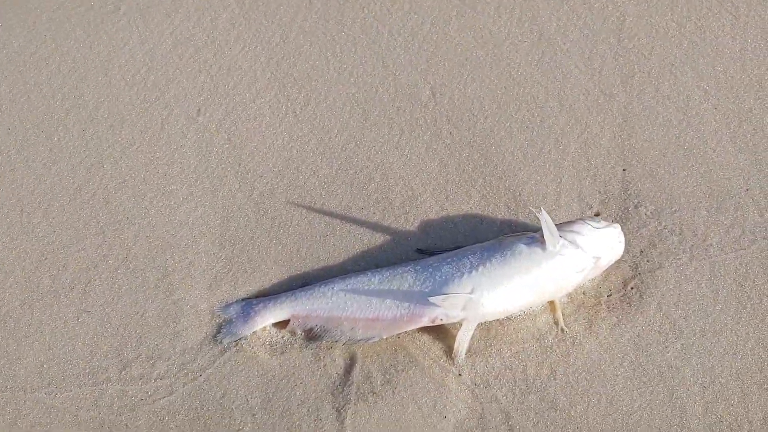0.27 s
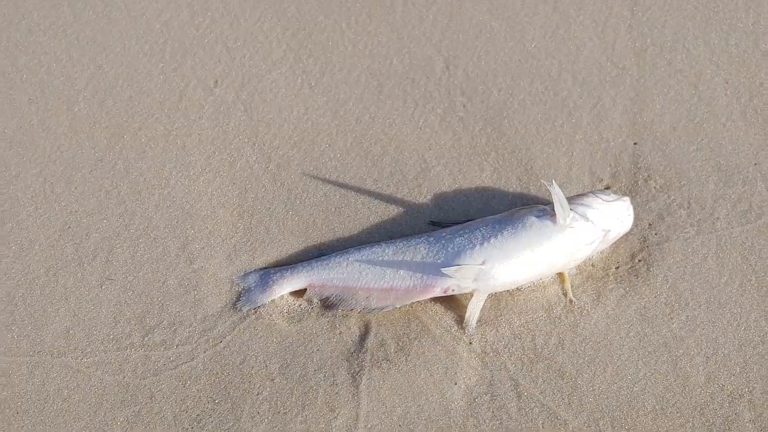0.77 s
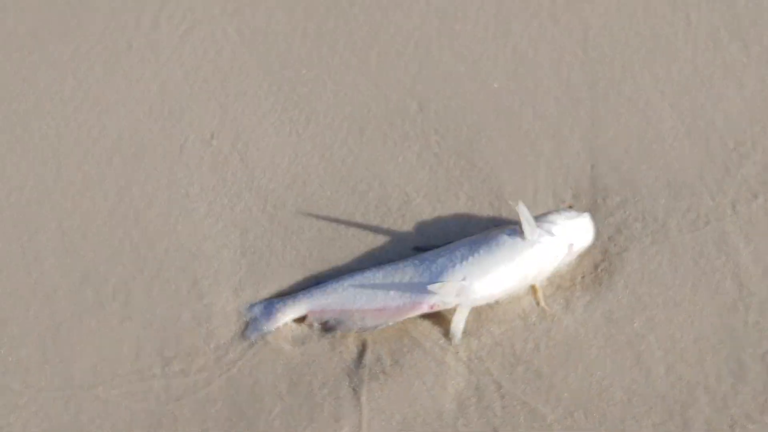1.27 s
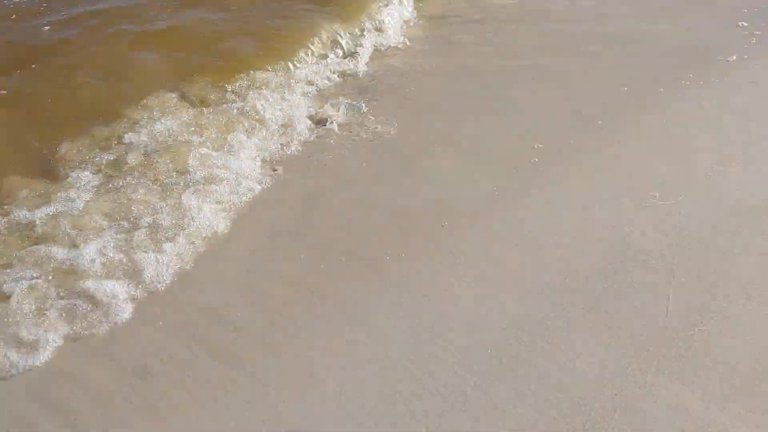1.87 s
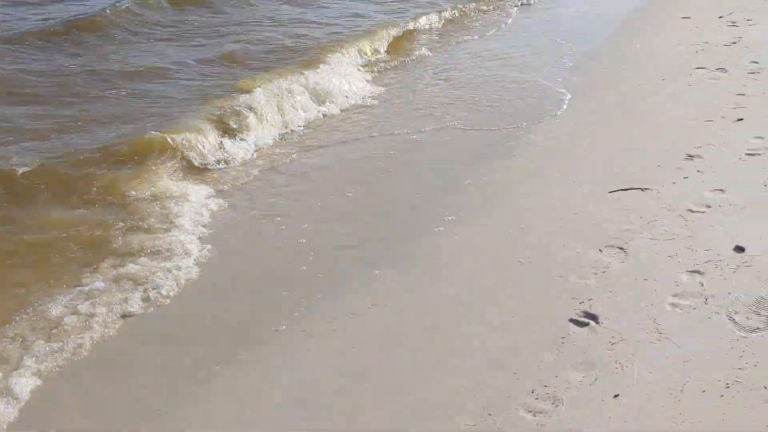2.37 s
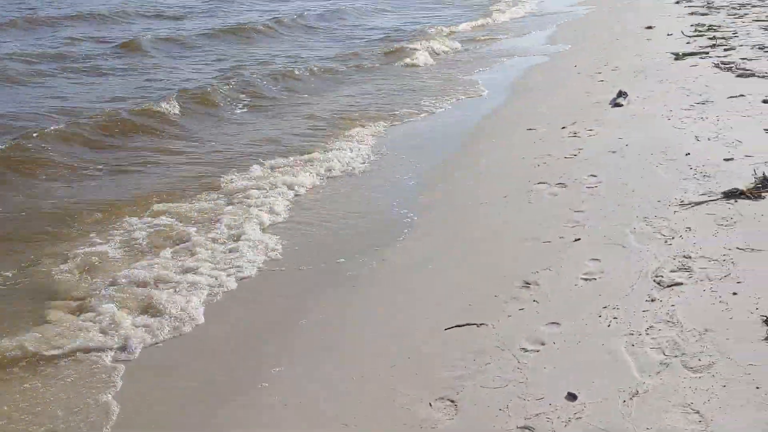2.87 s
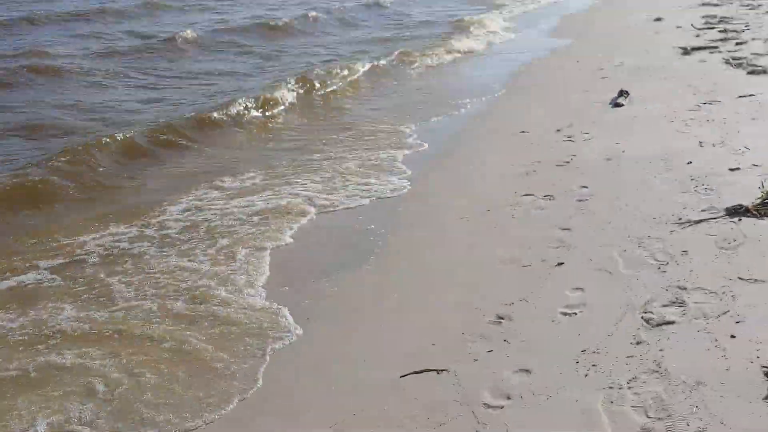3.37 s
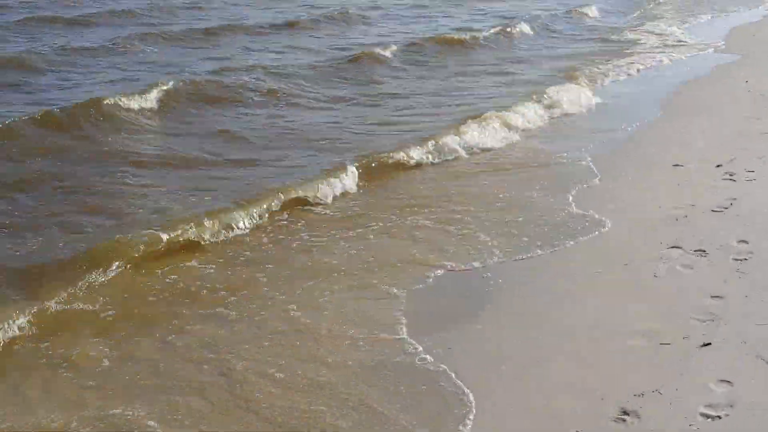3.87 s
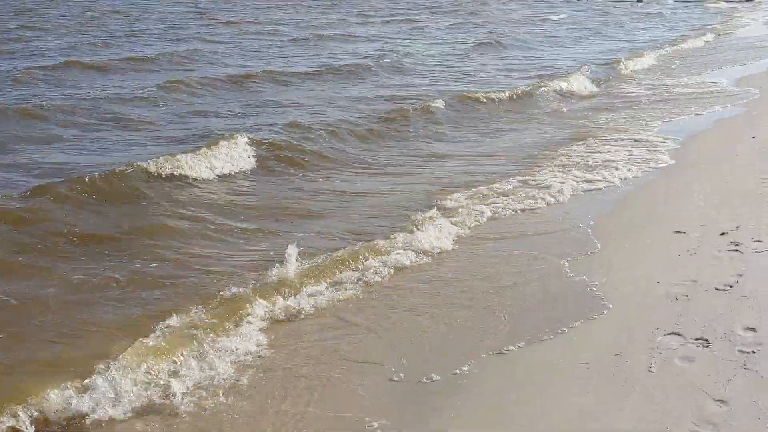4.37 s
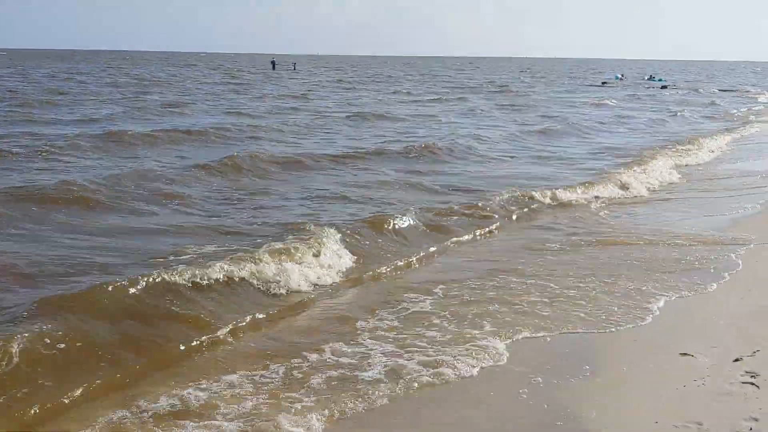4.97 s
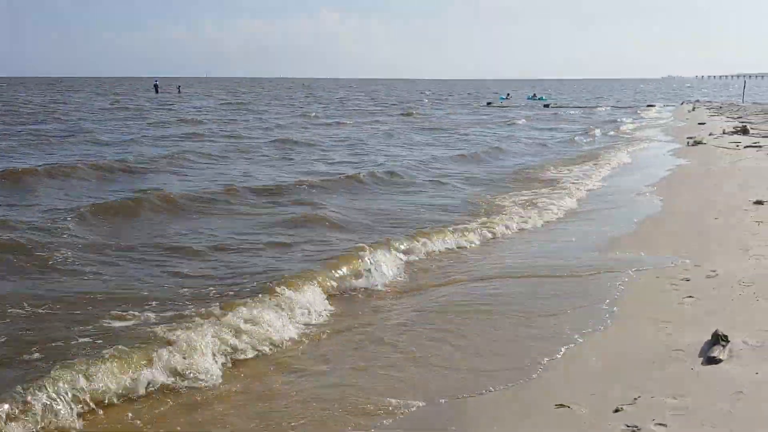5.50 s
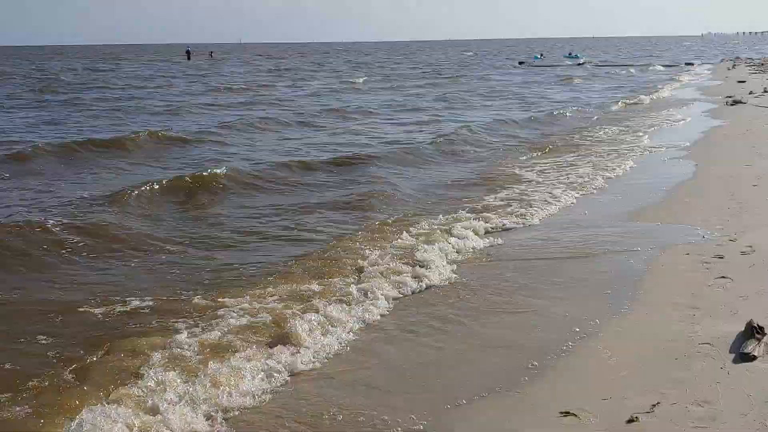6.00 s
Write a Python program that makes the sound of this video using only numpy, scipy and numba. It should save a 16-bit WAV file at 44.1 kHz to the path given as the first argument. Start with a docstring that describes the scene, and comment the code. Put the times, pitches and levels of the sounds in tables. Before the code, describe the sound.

Natural stereo seashore heard from a step or two away with a hand-held microphone. A small breaker is already spilling at the start, with a bubbly wash that thins by 0.8 s. Another slop arrives around 1.1 to 1.5 s, gurgling low with a wet splat. From about 1.7 to 3.5 s the surf is quieter: soft washing, foam hiss, stray bubble plops, its colour sweeping as the microphone lifts. Fuller waves swell near 3.9, 4.5 and 5.05 s, and a stronger one peaks around 5.8 s and fades toward the end. Foam detail leans left later on. Low wind rumble continues underneath, with short thumps on the left near 1.1 and 1.6 s, more to the right around 2.5 to 3.4 s, a heavy buffet near 3.8 to 4 s, and the roughest fluttering gusts at 5 to 5.25 s, then more around 6 s.

```python
"""Small waves spill and wash up a sandy beach, a step or two from a hand-held stereo camera.
Surf: ringing bubble clouds over filtered noise, gated per band by each wave; single bubbles, splats and ticks on top.
An echo off the wet sand notches the surf, so its colour sweeps as the camera is raised.
Wind: low-passed turbulence, unrelated at the two ports, with a steady breeze and gusts."""
import sys
import numpy as np
from scipy import signal
from scipy.fft import rfft, irfft
from scipy.io import wavfile
from scipy.ndimage import map_coordinates
from numba import njit

SR = 44100
rng = np.random.default_rng(int(sys.argv[2]) if len(sys.argv) > 2 else 0)


def master(y):
    """Save y as 16-bit WAV."""
    cut = np.clip(np.atleast_2d(y).T, -1, 1)
    pcm = np.round(cut * 32767)  # scale
    wavfile.write(sys.argv[1], SR, pcm.astype(np.int16))


N = 275184
TIME = np.arange(N) / SR
FREQ = np.maximum(np.arange(N // 2 + 1) * SR / N, 1)

# breaking waves: peak t/s, rise/s, wash/s, level/dB, churn and fizz re level/dB, hiss left minus right/dB
WAVES = [(0.1, 0.23, 0.44, -27, -3.5, -4.5, -2), (0.88, 0.0091, 0.099, -38.5, 5, 5, 1),
         (1.08, 0.13, 0.37, -28, -2.5, -3, 3), (1.41, 0.13, 0.16, -25.5, 0, -9, 4),
         (1.68, 0.047, 0.091, -34, 5.5, -14, 20), (2.12, 0.27, 0.13, -33, -3, -12, 5),
         (2.5, 0.7, 0.36, -33, 2, -1.2, -2), (3.14, 0.064, 0.064, -39.5, -11, -4, -7),
         (3.3, 0.15, 0.25, -34, 0.5, -7, -1), (3.69, 0.11, 0.1, -33.5, -3, -0.5, 2),
         (3.94, 0.23, 0.26, -29.5, -1.5, -2.5, -1), (4.5, 0.36, 0.22, -32.5, 2.5, -1, 1.5),
         (5.05, 0.4, 0.47, -30, -1, -1.5, -2.5), (5.84, 0.3, 0.28, -27.5, 2.5, -1, 1)]
# shore between waves: churn/dB, splash/dB, spray/dB, fizz/dB
LULL_DB = (-38.5, -40, -36.5, -42)
# bubble plumes, and at 2.52 s a bright band where the sand echo peaks: peak t/s, half length/s, centre f/Hz,
# width/octaves, level before colouring/dB, left minus right/dB
PLUMES = [(0.023, .13, 414, 1.24, -13, 2), (0.05, 0.16, 760, 0.82, -13.5, 0),
          (.45, 0.5, 2200, 0.72, -14, 1), (1.196, 0.23, 716, 0.88, -18.5, 2),
          (1.46, 0.071, 223, 0.77, -13, 4), (1.29, 0.12, 2200, .35, -11.5, -1),
          (1.315, .03, 580, 0.54, -14, 1), (1.37, 0.035, 890, 0.06, -9.5, 2),
          (1.48, .04, 2200, 1.1, -15, -1), (1.68, .15, 750, 0.91, -20, 0),
          (1.422, 0.058, 503, 0.92, -14.5, 3), (2.333, 0.16, 373, 0.56, -13.5, 0),
          (2.52, 0.24, 1890, 0.22, -12.5, -7), (2.42, .16, 2600, 0.52, -13.5, -14),
          (2.87, 0.13, 470, 0.45, -14.5, -1), (3.95, 0.5, 4700, 0.62, -11.5, -14),
          (3.9, 0.6, 3340, 0.31, -16, -10), (4.25, .2, 2150, 0.27, -15.5, -6),
          (4.77, 0.25, 2800, 0.7, -16, -12), (5.046, .1, 1830, .5, -15, -4),
          (5.9, 0.24, 2250, 0.22, -15.5, -7), (5.75, 0.5, 3270, 0.44, -15, -10),
          (5.824, 0.16, 6300, 0.61, -8.5, -25)]
# where the loudest crest lies: t/s, left port lead for short waves/ms, share of hiss from that spot/0-1
BEARING = [(0, 0.58, 0.36), (.72, 0.59, .85), (.85, .585, 0.12), (1.5, 0.57, .15), (1.65, .6, 0),
           (2.05, 1.3, .02), (2.3, 0.96, .12), (2.52, 0.84, 0.57), (2.72, .77, 0.4), (2.9, .64, 0.5),
           (3.1, .5, 0.47), (3.8, 0.46, 0.34), (4.0, 0.67, 0.3), (4.4, .68, 0.56), (4.8, 0.62, 0.4),
           (4.95, 0.48, .5), (5.2, 0.45, 0.5), (5.35, 0.67, 0.3), (5.6, 0.78, 0.56), (5.8, 0.68, 0.67),
           (6.24, 0.66, 0.5)]
# camera lift, sand to horizon: t/s, first echo notch left f/Hz, right f/Hz, echo strength/0-1
CAMERA = [(0, 207, 215, 0), (1.3, 213, 218, 0.1), (1.6, 266, 300, 0.17), (1.8, 367, 421, .45),
          (2.0, 455, 560, 0.64), (2.2, 516, 710, 0.64), (2.4, 660, 900, 0.48), (2.65, 754, 1030, .5),
          (2.95, 935, 1220, 0.27), (4.4, 980, 1330, 0.41), (5.2, 1100, 1420, 0.48), (6.24, 890, 1200, 0.36)]
# surf colour at the ports: f/Hz, left level/dB, right level/dB
PORT_COLOUR = [(171, 7, 1), (298, 4, 2), (580, 6.5, 4), (940, 3, 2), (1360, 6.5, 5.5), (1755, -7.5, 5),
               (2030, -10, 2), (2740, -7.5, -2.5), (3580, -13.5, -3.5), (4260, -12.5, -7),
               (5270, -13.5, -13.5), (6080, -16.5, -17), (7140, -22, -13), (8910, -39.5, -39.5),
               (9380, -29, -31), (11900, -23.5, -29), (13200, -40, -40), (15000.0, -42, -41)]
# edges between splash, spray and fizz, the lowest being churn to splash: f/Hz
SURF_EDGES_HZ = [850, 1700, 3500]
# edges of the separately swelling foam bands: f/Hz
PATCH_EDGES_HZ = [300, 450, 700, 1050, 1600, 2400, 3600, 5400, 8000]
# steady breeze: t/s, left level/dB, right level/dB, tilt of rumble towards large eddies/dB
BREEZE = [(0, -28.5, -34.5, 5), (1.1, -27.5, -36, 3.5), (1.7, -26, -34, -3), (2.25, -29.5, -29.5, 12),
          (2.6, -27, -23, 13), (3.5, -36, -23.5, 12.5), (3.72, -19.5, -23, -2), (4.65, -21, -22, -1.5),
          (5.28, -17, -19.5, 6), (5.6, -22.5, -20.5, 5), (6.24, -23.5, -25.5, -11)]
# gusts: peak t/s, half length/s, rumble level/dB, flutter level/dB, left minus right/dB
GUSTS = [(0.175, 0.024, -23.5, -33, 18), (1.078, 0.02, -19.5, -28, 23), (1.18, 0.017, -20, -36, 24),
         (1.61, 0.076, -23.5, -30, 26), (2.452, 0.049, -30, -36, -12), (2.757, 0.027, -23, -28.5, -14),
         (3.006, 0.05, -23, -23, -5), (3.234, 0.065, -22.5, -26, -7), (3.389, 0.022, -20, -29.5, -15),
         (3.79, 0.07, -19.5, -28, 2), (3.954, 0.15, -16.5, -20.5, 11), (4.865, 0.068, -22, -26, 18),
         (5.016, 0.035, -29, -13, 1.5), (5.119, 0.053, -34, -12.5, 6), (5.243, 0.018, -26, -16.5, -2),
         (5.947, 0.12, -22.5, -22, 18), (6.192, 0.063, -19, -23, 4)]
# spectrum of large eddies: f/Hz, level/dB
RUMBLE = [(12, -38), (25, -24), (40, -6), (58, -2), (85, -0.5), (115, 0.5), (160, -4.5), (240, -31),
          (500, -88)]
# spectrum of small eddies: f/Hz, level/dB
FLUTTER = [(70, -0.5), (130, -2.5), (175, 5), (240, 0.5), (320, -5), (430, -17.5), (700, -24.5),
           (2000, -74)]
# lumps of water slapping down: t/s, level before band-pass/dB, left minus right/dB
SPLATS = [(0.293, -15, 0), (0.3262, -20, 0), (.486, -21, 0), (0.824, -20, 2), (0.8374, -20.5, 2),
          (0.8688, -24, 0), (1.057, -17, -2), (1.45, -13, 0), (1.49, -17, 0), (1.8, -19.5, 0),
          (2.132, -19, -7), (2.3724, -24, 0), (3.061, -24, -6), (4.133, -18, -10), (4.769, -18, -8),
          (5.116, -16, -10), (6.086, -13, -9)]
# thin high ticks: t/s, level before band-pass/dB
TICKS = [(0.436, -28), (1.069, -22), (1.371, -27), (1.616, -24), (3.415, -33)]
# single bubbles and drops: t/s, level before decay/dB, start f/Hz, length/cycles, left minus right/dB
PLOPS = [(0.639, -22, 569, 46.3, 3), (1.003, -14.5, 467, 17, 3), (1.125, -9, 2160, 46, -9),
         (1.408, -12, 472, 27, 3), (1.745, -17, 1387, 46, 4), (2.625, -11, 1900, 25, -10),
         (3.623, -15, 6060, 26, 0), (4.089, -9, 2240, 27, -7), (4.248, -11, 1960, 20, -10),
         (5.021, -11, 1950, 24, -7)]

HISS_DB = -2  # breaker and foam, before colouring
BEND_DOWN_MS, BEND_UP_MS = 0.27, 0.15  # left port lead for long waves, camera down and up
LIFT_CHURN_DB, LIFT_SPLASH_DB = 3.5, 0.5  # gain added at full lift
BREEZE_FLUTTER_DB = -8  # flutter re rumble in the steady breeze
TOP_HZ = 15700


def undb(db):
    """Decibels to gain."""
    return 10 ** (np.asarray(db) / 20)


def unit(x):
    """Scale to rms 1."""
    return x / np.sqrt(np.mean(x ** 2))


def curves(table):
    """Columns of a timed table, one value a sample."""
    s, *columns = np.transpose(table)
    return [np.interp(TIME, s, column) for column in columns]


def colour(x, hz, db):
    """Filter by spectrum points joined on a log-frequency axis."""
    response = undb(np.interp(np.log(FREQ), np.log(hz), db))
    return irfft(rfft(x) * response, N)


def split(x, edges_hz, order=8):
    """Neighbouring bands that add up to the whole."""
    lowpasses = [1 / (1 + (FREQ / hz) ** order) for hz in edges_hz]
    below = [np.zeros_like(FREQ)] + lowpasses + [np.ones_like(FREQ)]
    whole = rfft(x)
    return [irfft(whole * band, N) for band in np.diff(below, axis=0)]


def late(x, delay_s):
    """Delay by a time that may move."""
    return map_coordinates(x, [np.arange(N) - delay_s * SR], order=3, mode="mirror")


def walk(rate_hz):
    """Smooth random curve of rms 1, low-passed near rate_hz."""
    spectrum = rfft(rng.standard_normal(N))
    return unit(irfft(spectrum / (1 + (FREQ / rate_hz) ** 4), N))


def pan(db):
    """Left and right gains of constant power."""
    gains = undb(np.array([db, -db]) / 2)
    return gains / np.sqrt(np.mean(gains ** 2, axis=0))


def swell(s, rise_s, fall_s):
    """Rounded rise and fall, 1 at its height."""
    return np.exp(-((TIME - s) / np.where(TIME < s, rise_s, fall_s)) ** 2)


@njit
def bubbles(start_s, hz, cycles, size, rise):
    """Each bubble is a decaying sine that climbs in pitch as it nears the surface."""
    out = np.zeros(N)
    for k in range(len(start_s)):
        first = int(start_s[k] * SR)
        life = cycles[k] * SR / hz[k]  # samples
        for i in range(min(int(life), N - first)):
            age = i / life
            envelope = (1 - np.exp(-40 * age)) * np.exp(-5 * age)
            phase = 2 * np.pi * hz[k] * i / SR * (1 + rise * age / 2)
            out[first + i] += size[k] * envelope * np.sin(phase)
    return out


def plumes(bubbles_per_cycle=1.6, spread_db=2.5, count=8000):
    """Narrow clouds of like-sized bubbles: mostly plumes trapped by collapsing crests, plus a bright band near
    1.9 kHz at 2.5 s where the sand echo peaks; higher-pitched clouds hold more bubbles."""
    out = np.zeros((2, N))
    for s, length_s, hz, octaves, db, pan_db in PLUMES:
        used = int(bubbles_per_cycle * hz * 2 * length_s) + 1
        when, pitch, ring, luck = rng.random((count, 4))[:used].T
        # logistic scatter about the height
        start_s = s + length_s * .3 * np.log((when + 1e-9) / (1 - when))
        size = (start_s >= 0) * undb(-spread_db * np.log(1 - .995 * luck))
        bubble_hz = hz * 2 ** (octaves * (pitch - .5))
        cloud = bubbles(np.abs(start_s), bubble_hz, 10 + 22 * ring ** 2, size, 0.077)
        rms = np.sqrt(np.mean(swell(s, length_s, length_s) ** 2))
        out += unit(cloud) * rms * undb(db) * pan(pan_db)[:, None]
    return out


def white_water(low_hz, high_hz, spread_db, wash_db, surge_db, count):
    """Bubble cloud, even per octave, over the noise wash of countless others; it comes in uneven slops."""
    when, pitch, ring, luck = rng.random((count, 4)).T
    hz = low_hz * (high_hz / low_hz) ** pitch
    size = undb(-spread_db * np.log(1 - .995 * luck)) * (hz / high_hz) ** 0.8
    cloud = bubbles(when * N / SR, hz, 5 + 22 * ring ** 2, size, 0.18)
    wash = split(rng.standard_normal(N), [low_hz, high_hz])[1]
    water = unit(cloud) + undb(wash_db) * unit(wash)
    return unit(water * undb(surge_db * walk(25)))


def breakers():
    """Gains of churn, splash, spray and fizz at each port: the power of each wave adds to that of the lull."""
    power = undb(LULL_DB)[:, None, None] ** 2
    for s, rise_s, wash_s, db, churn_db, fizz_db, pan_db in WAVES:
        # the camera shades only the hiss
        bands = [undb(churn_db) * pan(0), pan(0), pan(pan_db), undb(fizz_db) * pan(pan_db)]
        gains = undb(db) * np.array(bands)
        power = power + gains[:, :, None] ** 2 * swell(s, rise_s, wash_s)
    return np.sqrt(power)


def far_port(x, bend_ms, lead_ms, turn_rad=2.01):
    """Long waves bend round the camera, nearly together; short ones come later, phase-turned by its body."""
    long_waves, middle, short_waves = split(x, [1020, 1700])
    turned = irfft(rfft(short_waves) * np.exp(1j * turn_rad), N)
    return late(long_waves, bend_ms / 1000) + late(middle, 0.00032) + late(turned, lead_ms / 1000)


def patchy(x, patchy_db, rate_hz):
    """Foam patches open and close along the crest, so each band swells on its own."""
    return sum(band * undb(patchy_db * walk(rate_hz)) for band in split(x, PATCH_EDGES_HZ))


def sand_echo(water, notches_hz, strength):
    """Rough sand mirrors only the lower part, half a period of the notch later."""
    mirrored = split(water, [2400], order=4)[0]
    echoes = [late(port, .5 / notch_hz) for port, notch_hz in zip(mirrored, notches_hz)]
    return water + strength * np.array(echoes)


def surf():
    """The nearest breaker reaches the left port first; foam along the shore differs at each port."""
    churn_gain, splash_gain, spray_gain, fizz_gain = breakers()
    left_hz, right_hz, echo = curves(CAMERA)
    lead_ms, focus = curves(BEARING)
    focus = np.clip(focus, 0, 1)
    lift = (left_hz - left_hz.min()) / np.ptp(left_hz)
    bend_ms = BEND_DOWN_MS + lift * (BEND_UP_MS - BEND_DOWN_MS)

    body = white_water(130.5, 1524, spread_db=2.0, wash_db=1.5, surge_db=0.0, count=5000)
    breaker = white_water(1495, 15540, spread_db=2.5, wash_db=-1.0, surge_db=1.0, count=30000)
    foam = np.array([white_water(1490, 15570, spread_db=1.5, wash_db=0.0, surge_db=1.1, count=40000)
                     for _ in range(2)])
    far_wash = split(rng.standard_normal((2, N)), [1150])[0]

    # the finest fizz comes from everywhere
    foam, finest = split(foam, [7000])
    foam = np.sqrt(1 - focus) * foam + finest
    focused = np.sqrt(focus) * split(breaker, [7000])[0]
    left, right = undb(-11.5) * body + undb(HISS_DB) * focused + plumes()
    water = np.array([left, far_port(right, bend_ms, lead_ms)])
    water = water + undb(HISS_DB) * foam + undb(-5.5) * far_wash
    water = patchy(water, patchy_db=.8, rate_hz=6.2)
    water = sand_echo(water, [left_hz, right_hz], echo)
    hz, *port_db = np.transpose(PORT_COLOUR)
    water = np.array([colour(port, hz, db) for port, db in zip(water, port_db)])

    _, churn, splash, spray, fizz = split(water, [140] + list(SURF_EDGES_HZ))
    churn = unit(churn) * churn_gain * undb(LIFT_CHURN_DB * lift)
    splash = unit(splash) * splash_gain * undb(LIFT_SPLASH_DB * lift - 2.5)
    spray = unit(spray) * spray_gain * undb(1.73)
    fizz = unit(fizz) * fizz_gain * undb(1.5)
    return churn + splash + spray + fizz


def eddies(spectrum, middle_hz, tilt_db, buffet_db, rate_hz):
    """Lumpy turbulent pressure, unrelated at the ports; colour tilts about the middle at constant power."""
    hz, db = np.transpose(spectrum)
    ports = [colour(rng.standard_normal(N), hz, db) * undb(buffet_db * walk(rate_hz)) for _ in range(2)]
    large, small = split(unit(np.array(ports)), [middle_hz], order=4)
    tilt = undb(tilt_db)
    power = (np.var(large) + tilt ** 2 * np.var(small)) / (np.var(large) + np.var(small))
    return (large + tilt * small) / np.sqrt(power)


def wind():
    """Large eddies rumble all the time; strong gusts shed small ones that flutter ever higher."""
    left_db, right_db, depth_db = curves(BREEZE)
    rumble_power = undb([left_db, right_db]) ** 2
    flutter_power = rumble_power * undb(BREEZE_FLUTTER_DB) ** 2
    for s, length_s, rumble_db, flutter_db, pan_db in GUSTS:
        gust = swell(s, length_s, length_s) * pan(pan_db)[:, None] ** 2
        rumble_power = rumble_power + gust * undb(rumble_db) ** 2
        flutter_power = flutter_power + gust * undb(flutter_db) ** 2
    force_db = 10 * np.log10(np.mean(flutter_power, axis=0))
    flutter_tilt_db = 0.71 * (force_db - np.mean(force_db))
    rumble = eddies(RUMBLE, middle_hz=59.6, tilt_db=-depth_db, buffet_db=1.73, rate_hz=39)
    flutter = eddies(FLUTTER, middle_hz=242, tilt_db=flutter_tilt_db, buffet_db=1.0, rate_hz=21)
    return rumble * np.sqrt(rumble_power) + flutter * np.sqrt(flutter_power)


def splats(decay_s=0.003):
    """Thrown water lands with a short wet tick: decaying band-passed noise."""
    envelope = np.zeros((2, N))
    for s, db, pan_db in SPLATS:
        decay = (TIME >= s) * np.exp(-np.abs(TIME - s) / decay_s)
        envelope += undb(db) * pan(pan_db)[:, None] * decay
    left, right = split(envelope * rng.standard_normal(N), [900, 6000], order=6)[1]
    return undb(3.0) * np.array([left, late(right, 0.00053)])


def ticks(decay_s=0.0015, pan_db=6):
    """Thin, high ticks close to the left port: decaying noise in a narrow band."""
    envelope = sum(undb(db) * (TIME >= s) * np.exp(-np.abs(TIME - s) / decay_s) for s, db in TICKS)
    band = split(envelope * rng.standard_normal(N), [9500, 12500], order=16)[1]
    return band * pan(pan_db)[:, None]


def plops():
    """Now and then one pocket of air rings above the rest, slightly later at the right port."""
    s, db, hz, cycles, pan_db = np.transpose(PLOPS)
    left, right = (bubbles(s, hz, cycles, undb(db) * gain, 0.066) for gain in pan(pan_db))
    return np.array([left, late(right, 0.00013)])


def scene():
    """Surf, its single bubbles and splats, a few thin ticks, and the wind."""
    return surf() + plops() + splats() + ticks() + wind()


def record(dry):
    """The camera rounds off peaks towards 0.93 and cuts everything above TOP_HZ."""
    rounded = dry / (1 + (dry / .93) ** 6) ** (1 / 6)
    lowpass = signal.ellip(10, .2, 80, TOP_HZ, fs=SR, output="sos")
    return signal.sosfilt(lowpass, rounded)


dry = scene()
out = record(dry)
master(out)
```